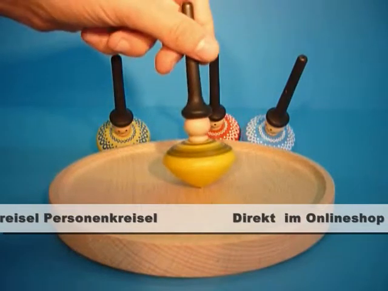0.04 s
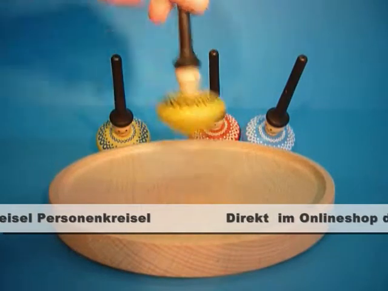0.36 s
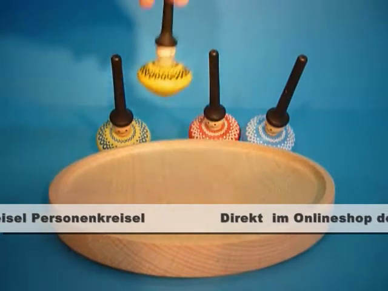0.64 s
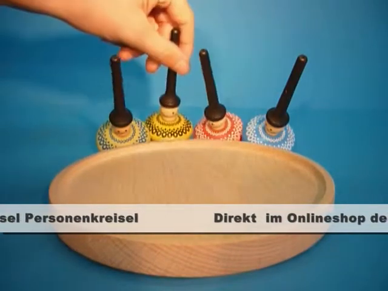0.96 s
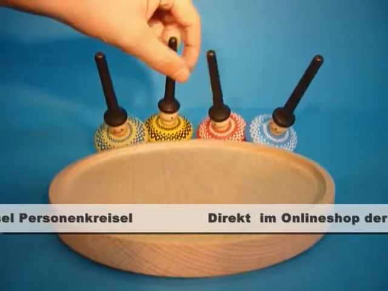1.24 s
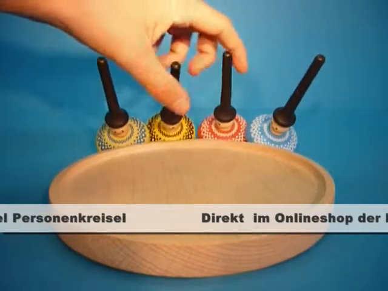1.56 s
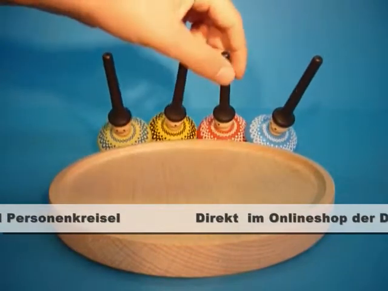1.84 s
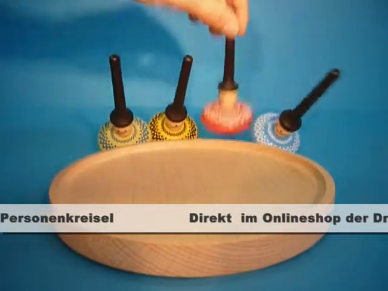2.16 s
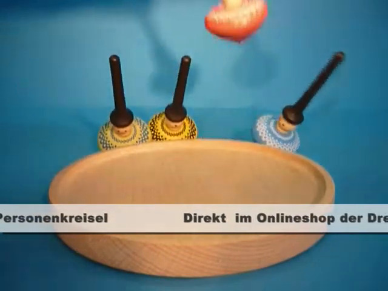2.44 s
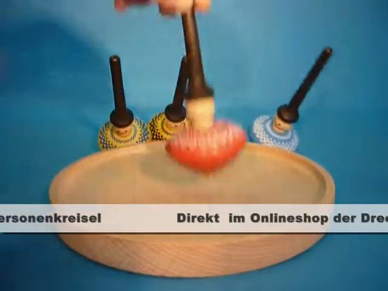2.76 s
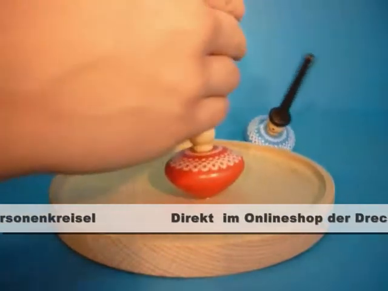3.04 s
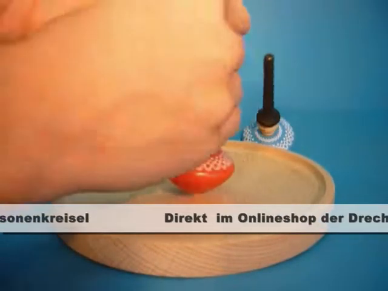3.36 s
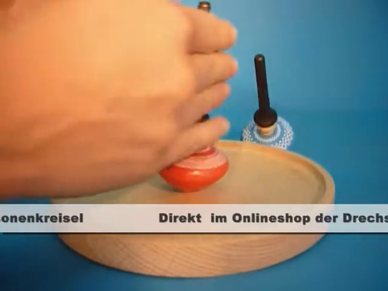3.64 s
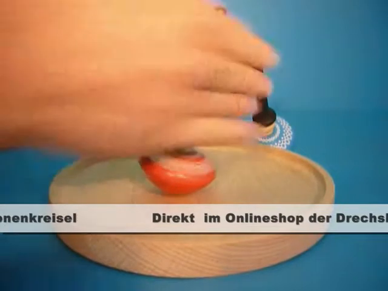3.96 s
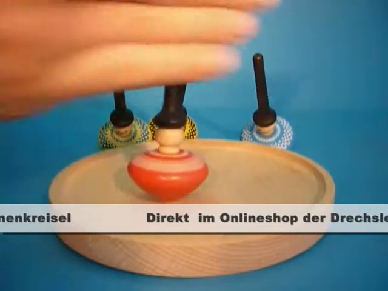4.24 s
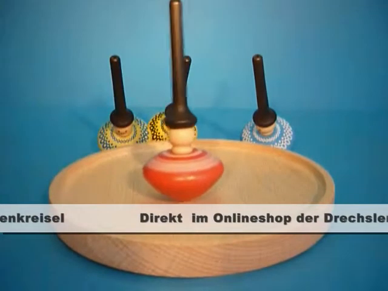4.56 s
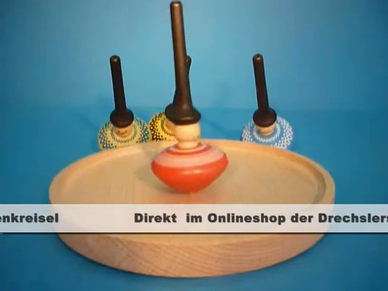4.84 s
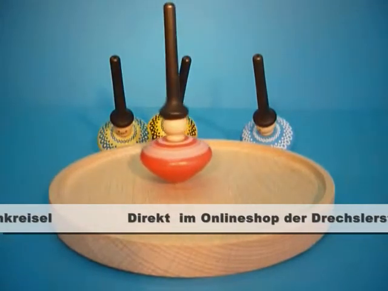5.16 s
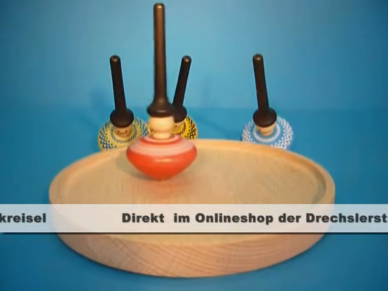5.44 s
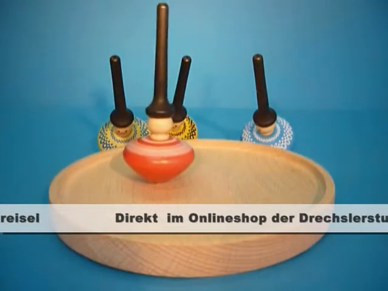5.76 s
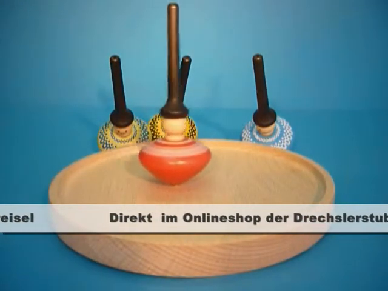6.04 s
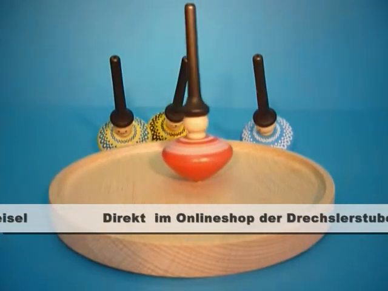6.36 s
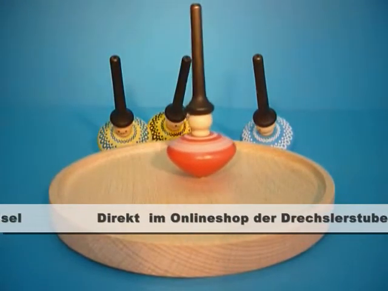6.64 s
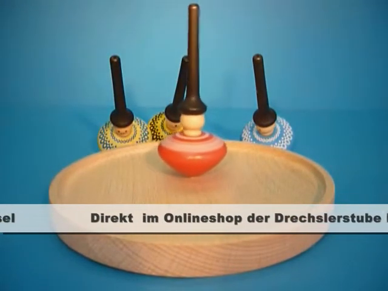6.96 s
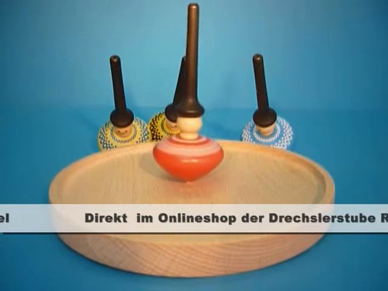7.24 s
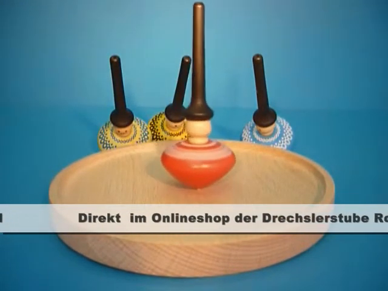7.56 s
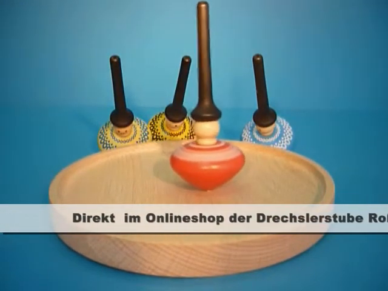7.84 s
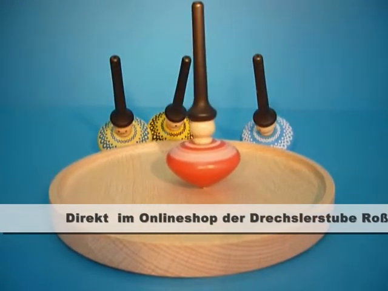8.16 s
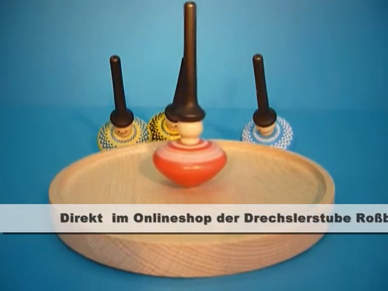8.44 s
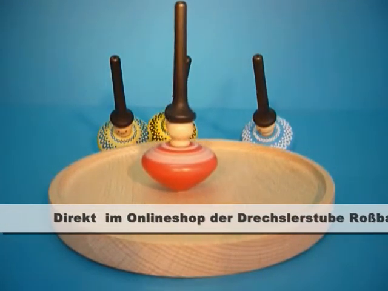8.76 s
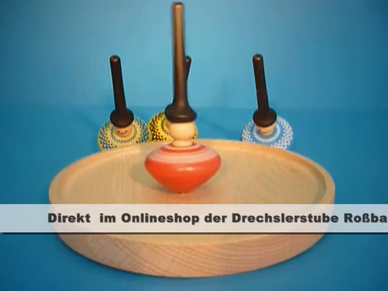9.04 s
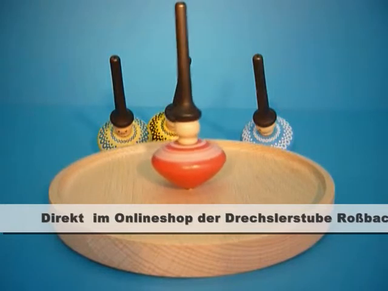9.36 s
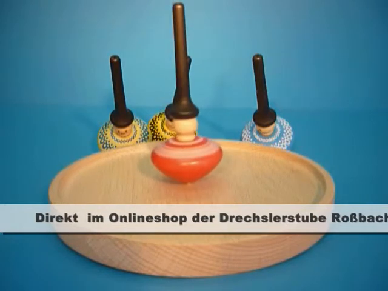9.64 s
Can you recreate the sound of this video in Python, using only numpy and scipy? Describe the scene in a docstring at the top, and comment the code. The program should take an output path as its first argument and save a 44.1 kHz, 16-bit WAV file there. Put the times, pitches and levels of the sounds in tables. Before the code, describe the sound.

A wooden top's faint spin dies under the fingers, and it is put down on a table with a knock and a heavier thud. Another top hits a wooden dish with three sharp, separate knocks that ring briefly. Palms roll it away with a short swish and a light clatter, and it spins on with a faint purr and tiny ticks. The microphone is close, in a small, quiet room.

```python
"""Wooden tops in a dish

A table in a small, quiet room, the microphone close to a turned wooden dish. One spinning top is
stopped with the fingers and put down on the table behind. The next bumps the rim, is stood in the dish
and is rolled off between the palms; each knock rings the wood. It spins with a faint purr, its tip
wandering over the grain. Before the launch, thin whistles come and go, barely audible."""
import sys
import numpy as np
from scipy import signal
from scipy.fft import rfft, irfft, next_fast_len
from scipy.io import wavfile
from scipy.ndimage import uniform_filter1d

SR = 44100
rng = np.random.default_rng(int(sys.argv[2]) if len(sys.argv) > 2 else 0)


def digitize_waveform(pressure):
    """Quantize a signal to 16-bit integers and store it at the path in sys.argv[1].

    Rows of a 2-D input are taken as channels; values are limited to [-1, 1].
    """
    field = np.atleast_2d(pressure).T
    bounded = np.clip(field, -1, 1)
    quanta = np.round(bounded * 32767).astype(np.int16)
    wavfile.write(sys.argv[1], SR, quanta)


N = 432621
TIME = np.arange(N) / SR
RING_TIME = TIME[:SR // 4]

# Levels are relative within each table; contact_hz is the brightness of a knock.
# still air of the room and microphone hiss: frequency_hz, level_db
AIR_SPECTRUM = [(30, -14), (70, -21), (110, 2), (170, 2), (350, -1), (600, -4.5), (1000, -7.5),
                (2000, -11.5), (3000, -14.5), (4500, -18.5), (6500, -21), (7100, -38.5), (7700, -82.5)]
# fingers slide on a stem: start_s, length_s, level_db
FINGER_STROKES = [(0, 0.19, -58), (3.59, 0.082, -58.5)]
# hiss of those fingers: frequency_hz, level_db
FINGER_SPECTRUM = [(1500, -17), (3600, 1), (4900, -8), (5900, 2), (6500, -2.5), (7200, -41)]
# modes of the dish, by where it is struck: pitch_hz, t60_s, centre_db, slope_db, rim_db
DISH_MODES = [(248.4, 0.23, -23.5, -28.5, -46), (295, 0.023, -18, -25.5, -24.5),
              (448.5, 0.17, -22.5, -19, -44.5), (511, 0.089, -24, -28, -19.5),
              (594, 0.026, -24, -25, -19.5), (766, 0.053, -31, -35.5, -39.5),
              (965, 0.0096, -28, -40, -19.5), (1104, 0.065, -23, -31, -20),
              (1180, 0.072, -19, -22.5, -18.5), (1233, 0.23, -23.5, -24.5, -27),
              (1268, 0.054, -14, -18.5, -22.5), (1302, .09, -34.5, -33, -23), (1406, 0.065, -26, -24, -21),
              (1486, 0.089, -16, -25, -25.5), (1727, .08, -33, -34, -35), (1797, .05, -36, -44.5, -20.5),
              (1890, .06, -51, -26, -25), (1990, .04, -25.5, -44, -13.5), (2080, 0.027, -45, -43, -27.5),
              (2230, 0.029, -39, -24.5, -35), (2590, .012, -18.5, -42, -21.5),
              (2985, 0.038, -27, -24.5, -22)]
# modes of a top, by where it is struck: pitch_hz, t60_s, tip_db, flank_db
TOP_MODES = [(3160, 0.018, -17, -20), (3310, 0.009, -17, -29), (3550, 0.017, -24, -51.5),
             (4130, 0.02, -38.5, -33.5), (5070, 0.033, -38, -34.5), (6730, .018, -56.5, -37)]
# modes of the table: pitch_hz, t60_s, level_db
TABLE_MODES = [(135.4, 0.22, -29), (202, 0.06, -27.5), (260, 0.1, -23), (284, 0.12, -22.5),
               (371, 0.11, -24), (450, 0.041, -22.5), (590, 0.034, -16.5), (760, .026, -22),
               (1000, 0.0061, -11.5), (1177, .02, -29), (1566, 0.01, -27), (2220, 0.002, -13.5),
               (3800, .009, -24)]
# the spin slows: time_s, turns_per_s
SPIN_RATE = [(4.2, 31), (9.8, 28)]
# the tip's path in the dish: time_s, outward (0 near the centre, 1 near the rim)
TIP_PATH = [(4.3, 0.17), (5.0, 0.32), (5.2, 0.53), (5.45, 0.66), (5.8, .15), (6.1, .15), (6.3, 0.34),
            (7.0, 0.55), (8.0, 0.37), (8.6, 0.67), (9.8, 0.26)]
# the second top's low purr over rougher and smoother wood: time_s, level_db
PURR_LEVELS = [(4.25, -61), (4.45, -65), (4.75, -61), (4.93, -80), (5.1, -56), (5.48, -57), (5.72, -59.5),
               (5.92, -65), (6.08, -64), (6.2, -59), (6.48, -59), (6.55, -69), (6.82, -70), (7.2, -63.5),
               (7.4, -70), (7.6, -62.5), (7.88, -74), (8.5, -64), (9.3, -69.5), (9.8, -65)]
# its brighter rub: time_s, level_db
RUB_LEVELS = [(4.25, -63), (4.45, -62.5), (4.9, -60), (5.2, -63.5), (5.48, -54.5), (5.56, -64), (5.72, -66),
              (5.92, -62), (6.16, -65.5), (6.36, -56.5), (6.6, -60), (6.68, -64), (6.87, -66),
              (6.97, -61.5), (7.9, -67), (8.2, -60.5), (8.5, -63), (8.9, -63.5), (9.8, -65)]
# push of the grain on a rolling tip: frequency_hz, level_db
PURR_SPECTRUM = [(100, -6), (250, -15), (360, 11.5), (430, 0.5), (500, 2.5), (620, -2), (900, -24),
                 (1300, -45.5), (3000, -45)]
# on a rubbing tip: frequency_hz, level_db
RUB_SPECTRUM = [(400, -41), (900, -19), (1240, -15.5), (1460, -6), (1750, -10), (3000, -8), (6000, -21)]
# on a skidding tip: frequency_hz, level_db
SKID_SPECTRUM = [(100, -10), (290, -5), (370, 2), (500, 7.5), (900, -11), (1260, -5), (1600, 4), (2100, -5),
                 (3000, -12), (6000, -26)]
# faint whistles, one curve each: time_s, pitch_hz, level_db
WHISTLE_CURVES = [
    [(0.37, 2950, -64), (0.4, 2920, -60), (0.46, 2850, -71)],
    [(3.19, 4060, -64), (3.208, 4340, -59), (3.255, 4380, -58), (3.27, 4400, -68)],
    [(3.255, 5050, -64), (3.328, 4880, -65), (3.374, 4500, -64), (3.41, 4630, -61), (3.47, 4560, -65.5),
     (3.56, 5040, -64.5), (3.66, 4920, -65), (3.71, 5040, -63), (3.85, 4890, -64), (3.89, 4500, -61)],
]
# blows on the table: start_s, level_db, contact_hz, top_ring_db
TABLE_BLOWS = [(0.9633, -2, 1390, -21), (1.1023, -10, 2800, -29), (1.1089, 4, 673, -28.5)]
# knocks on the dish, the loud ones followed about 10 ms later by a close echo:
# start_s, level_db, contact_hz, place (0 centre, 1 rim), top_ring_db, crack_db
DISH_KNOCKS_AND_ECHOES = [(2.184, -20.5, 890, 1, -14, -22), (2.2000, -1.5, 5200, 0.97, 6, -17),
                          (2.21, -6.5, 2400, 0.55, -4, -24), (3.027, 0.5, 2500, 0.048, 7, -15.5),
                          (3.0367, -10.5, 3000, 0, 3, -12.5), (3.168, -13, 2400, 0.59, 3, -11),
                          (3.1782, -11.5, 716, 0.085, -10, -23), (3.6116, 0, 1900, 0.57, -8, -11.5),
                          (3.6211, -15.5, 2800, 0.84, -9, -10), (4.101, -22, 2400, 0.23, -14, -14),
                          (4.107, -23, 2400, 0, -13, -20), (4.1150, -18.5, 3400, 0.67, 1, 11.5),
                          (4.1572, -26, 1970, 0.97, -18, -10), (4.1635, -25.5, 2500, 1, -15, -7),
                          (4.188, -30, 1400, .3, -8, -5), (4.205, -21.5, 1100, 0.48, 12, -4),
                          (4.235, -28, 1700, .5, -6, -19)]
# the spinning tip hops and lands softly in the hollow: start_s, level_db, contact_hz
TIP_HOPS = [(4.537, -35, 500), (4.768, -31, 500), (5.001, -26, 500), (5.141, -30, 600), (5.219, -35, 700),
            (5.284, -34, 600), (5.429, -39, 2510), (5.452, -44, 2500), (5.9303, -25, 500),
            (6.068, -26, 500), (6.267, -37, 2500), (6.371, -36, 1800), (6.44, -28, 700), (6.477, -34, 600),
            (6.5814, -36, 2500), (8.1604, -37, 3000), (8.595, -27, 450), (9.54, -31, 500),
            (9.672, -29, 500)]
# the palms meet, slide and flick the stem away: start_s, length_s, level_db
PALM_STROKES = [(4.05, 0.2, -53.5), (4.067, 0.12, -49.5), (4.106, 0.042, -37.5)]
# skin sliding on skin: frequency_hz, level_db
PALM_SPECTRUM = [(50, -8), (110, 6.5), (400, 8.5), (900, -4.5), (1700, 1), (2400, -10), (3300, 4),
                 (4200, -3), (5200, 1.5), (6800, -1.5), (8200, -10), (9400, -21)]
# the tip skids at the launch: start_s, length_s, level_db
SKID_STROKES = [(4.093, 0.017, -37), (4.152, 0.043, -41.5)]
# first reflections from the table and walls: delay_s, gain
REFLECTIONS = [(.0041, 0.22), (.017, 0.28), (0.0301, .18), (.05, 0.081)]
# decay of the room: frequency_hz, t60_s
ROOM_DECAY = [(120, 0.23), (300, 0.55), (600, 0.28), (1300, 0.37), (3000, 0.3), (7000, 0.51)]


def amp(db):
    """Decibels to gain."""
    return 10 ** (np.asarray(db) / 20)


def unit(x):
    """Scales to an rms of 1."""
    return x / np.sqrt(np.mean(x ** 2) + 1e-20)


def at_hz(points, hz):
    """Reads a table on a log-frequency axis."""
    frequencies, values = np.transpose(points)
    return np.interp(np.log(hz + 1), np.log(frequencies + 1), values)


def swell(rows):
    """Gain over time from (time_s, level_db) rows, silent outside them."""
    s, db = np.transpose(rows)
    return amp(np.interp(TIME, s, db)) * (TIME >= s[0]) * (TIME <= s[-1])


def strokes(rows, attack_s, release_s):
    """Gain over time of sliding contacts: each rises, holds, then falls 60 dB in release_s."""
    gain = np.zeros(N)
    for start_s, length_s, db in rows:
        rise = np.clip((TIME - start_s) / attack_s, 0, 1)
        gain += rise * amp(db - 60 * np.maximum(TIME - start_s - length_s, 0) / release_s)
    return gain


def add(mix, start_s, sound):
    """Mixes a sound in at start_s."""
    part = mix[round(start_s * SR):][:len(sound)]
    part += sound[:len(part)]


def colour(x, spectrum):
    """Gives noise a spectrum, at an rms of 1."""
    size = next_fast_len(N)
    gain = amp(at_hz(spectrum, np.fft.rfftfreq(size, 1 / SR)))
    return unit(irfft(rfft(x, size) * gain, size)[:N])


def drift(hz):
    """A random wavering of rms 1, changing hz times a second."""
    knots = rng.standard_normal(N // 20)
    return unit(np.interp(TIME * hz, np.arange(len(knots)), knots))


def grit(per_s, spread_db):
    """Tiny random contacts of uneven size."""
    size = amp(spread_db * np.minimum(rng.exponential(1, N), 4)) * rng.choice([-1, 1], N)
    return unit(size * (rng.random(N) < per_s / SR))


def soften(x, hz, order=2):
    """Leaves out the treble."""
    return signal.sosfilt(signal.butter(order, hz, fs=SR, output="sos"), x)


def radiate(x, hz):
    """A small body hardly moves the air at low pitch."""
    return signal.sosfilt(signal.butter(2, hz, "high", fs=SR, output="sos"), x)


def ring(modes, group=1):
    """Wood's answer to one tap: dying sines, neighbouring groups starting in opposite directions."""
    return sum((-1) ** (k // group) * amp(db - 60 * RING_TIME / t60) * np.sin(2 * np.pi * hz * RING_TIME)
               for k, (hz, t60, db) in enumerate(modes))


def struck(modes, place, group=3):
    """A body's ring; the place struck, 0-1 across the level columns, decides which modes are fed."""
    fed = [(hz, t60, np.interp(place, np.linspace(0, 1, len(levels)), levels))
           for hz, t60, *levels in modes]
    return ring(fed, group)


def excite(force, response):
    """A body or a room rung by a signal."""
    return signal.oaconvolve(force, response)[:N]


def room_tone(air_db=-52.5, hum_hz=111.8, hum_db=-63.5):
    """Still air and microphone hiss, with a weak hum that wavers."""
    pitch = hum_hz + 3 * drift(hz=25.9)
    hum = np.sin(2 * np.pi * np.cumsum(pitch) / SR) * amp(2 * drift(hz=4.6))
    return amp(air_db) * colour(rng.standard_normal(N), AIR_SPECTRUM) + amp(hum_db) * unit(hum)


def fingers():
    """Dry fingertips hiss as they slide on a stem."""
    hiss = colour(rng.standard_normal(N), FINGER_SPECTRUM)
    return strokes(FINGER_STROKES, attack_s=0.0081, release_s=0.49) * hiss


def spinning_tip(brake_db_per_s=123):
    """The tip rolls and rubs over the grain, pressing harder once a turn; its path colours the ring."""
    turns = np.cumsum(np.interp(TIME, *np.transpose(SPIN_RATE))) / SR
    pressure = amp(5.6 * np.sin(2 * np.pi * turns) + 1.5 * drift(hz=18))
    bumps = pressure * grit(per_s=900, spread_db=3)
    outward = np.interp(TIME, *np.transpose(TIP_PATH))
    wood = excite(bumps * (1 - outward), struck(DISH_MODES, place=0.09))
    wood += excite(bumps * outward, struck(DISH_MODES, place=0.93))
    braked = amp(-57 - brake_db_per_s * TIME)  # the first top dies away under the fingers
    purr = (braked + amp(0.5) * swell(PURR_LEVELS)) * colour(wood, PURR_SPECTRUM)
    rub = (braked + amp(-2.5) * swell(RUB_LEVELS)) * colour(wood, RUB_SPECTRUM)
    return purr + rub


def whistle(curve, jitter=0.012):
    """One thin tone, unsteady in pitch and level."""
    s, hz, db = np.transpose(curve)
    pitch = np.interp(TIME, s, hz) * (1 + jitter * drift(hz=746))
    gain = amp(-1.5 + 2.2 * drift(hz=92.6)) * swell(np.c_[s, db])
    return gain * unit(np.sin(2 * np.pi * np.cumsum(pitch) / SR))


def table_knocks():
    """A top lands on its tip behind the dish, then settles with a heavier thud."""
    out, table = np.zeros(N), ring(TABLE_MODES)
    click = top_ring(place=0) + crack(db=-7.5)
    for start_s, db, contact_hz, top_db in TABLE_BLOWS:
        thud = radiate(soften(table, contact_hz), hz=90)  # a longer contact is duller
        add(out, start_s, amp(db) * (thud + amp(top_db) * click))
    return soften(out, hz=6900, order=16)


def top_ring(place):
    """A top's stem and body ring from a knock on its tip (0) or flank (1)."""
    return radiate(struck(TOP_MODES, place, group=1), hz=1790)


def crack(db, decay_s=0.00008):
    """The pressure spike of hard wood meeting wood."""
    age = RING_TIME / decay_s
    return amp(db) * (1 - age) * np.exp(-age)


def dish_knocks(hop_place=0.35, hop_top_db=-13, hop_crack_db=-15):
    """Knocks and hops ring top and dish and thud into the table; loud knocks have a close echo."""
    out = np.zeros(N)
    thud = amp(-7.5) * soften(ring(TABLE_MODES), hz=204)
    hops = [(*hop, hop_place, hop_top_db, hop_crack_db) for hop in TIP_HOPS]
    for start_s, db, contact_hz, place, top_db, crack_db in DISH_KNOCKS_AND_ECHOES + hops:
        dish = radiate(soften(struck(DISH_MODES, place) + crack(crack_db), contact_hz), hz=300)
        table = amp(-4 * place) * thud  # a sideways knock at the rim hardly loads the table
        top = amp(top_db) * soften(top_ring(place), contact_hz, order=1)
        add(out, start_s, amp(db) * (dish + table + top))
    return soften(out, hz=7140, order=16)  # the knocks' treble is cut off above about 7 kHz


def palms():
    """The palms roll the stem away: dry skin hisses with tiny slips."""
    slips = colour(grit(per_s=5400, spread_db=2.5), PALM_SPECTRUM)
    return strokes(PALM_STROKES, attack_s=0.0057, release_s=0.045) * slips


def skids():
    """At the launch the tip scrapes across the grain, ringing dish and table."""
    wood = struck(DISH_MODES, place=0.3) + amp(7.5) * ring(TABLE_MODES)
    scrape = colour(excite(grit(per_s=1500, spread_db=3), wood), SKID_SPECTRUM)
    return strokes(SKID_STROKES, attack_s=0.008, release_s=0.094) * scrape


def diffuse_tail(smooth_hz=35, length_s=0.7):
    """The room's tail: noise that dies band by band, with no pitch much favoured."""
    hz, t, bands = signal.stft(rng.choice([-1., 1.], SR), SR, nperseg=256)
    bands = bands * amp(-60 * t / at_hz(ROOM_DECAY, hz)[:, None])
    spectrum = rfft(signal.istft(bands, SR, nperseg=256)[1][:SR])
    even = spectrum / np.sqrt(uniform_filter1d(abs(spectrum) ** 2, smooth_hz))
    return irfft(even, SR) * (TIME[:SR] < length_s)


def room(x, tail_db, near_s, near_db, wall_hz=2500, echo_hz=3000, onset_s=0.0048):
    """An echo from the nearest wall and weaker ones, then a tail whose treble the walls swallow."""
    tail = diffuse_tail() * np.minimum(TIME[:SR] / onset_s, 1) ** 2
    tail = amp(tail_db) * soften(tail / np.linalg.norm(tail), wall_hz, order=3)
    echoes = np.zeros(SR)
    for delay_s, gain in REFLECTIONS + [(near_s, amp(near_db))]:
        echoes[round(delay_s * SR)] += gain
    return x + excite(x, tail + soften(echoes, echo_hz))


def scene():
    """The dish is close to the microphone; the table behind it carries a little more of the room."""
    close = dish_knocks() + palms() + fingers() + spinning_tip() + skids()
    close += sum(whistle(curve) for curve in WHISTLE_CURVES)
    front = room(close, tail_db=-2.5, near_s=0.0088, near_db=-10.5)
    behind = room(table_knocks(), tail_db=-2, near_s=0.0112, near_db=-11)
    return (front + behind + room_tone())[None]


def record(dry):
    """A small mono camera microphone with a steady offset and a narrow band."""
    offset, edge_hz = -0.0687, 9400
    lowpass = signal.firwin(511, edge_hz, window=("kaiser", 9), fs=SR)
    return signal.oaconvolve(dry + offset, lowpass[None], "same")


dry = scene()
out = record(dry)
digitize_waveform(out)
```